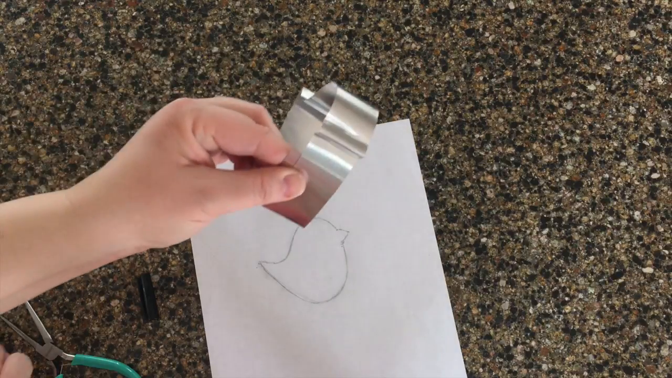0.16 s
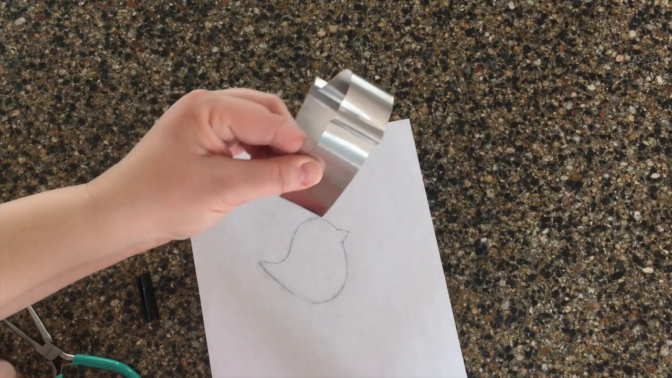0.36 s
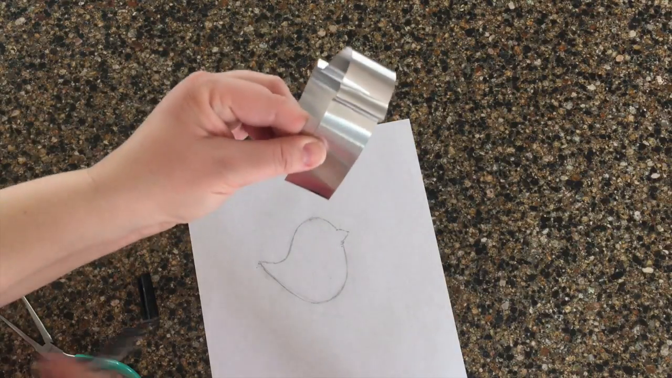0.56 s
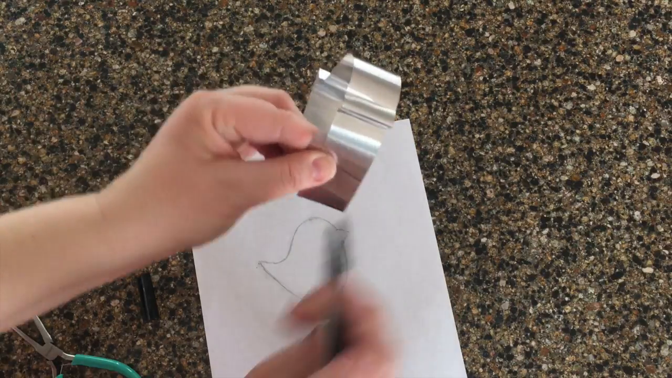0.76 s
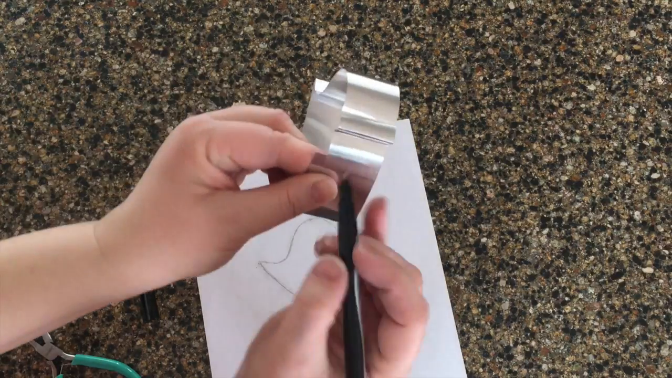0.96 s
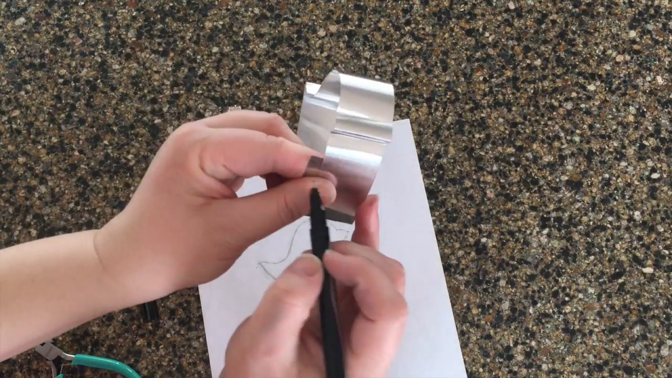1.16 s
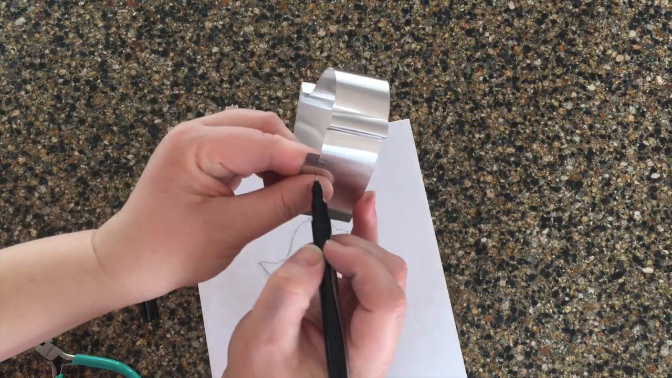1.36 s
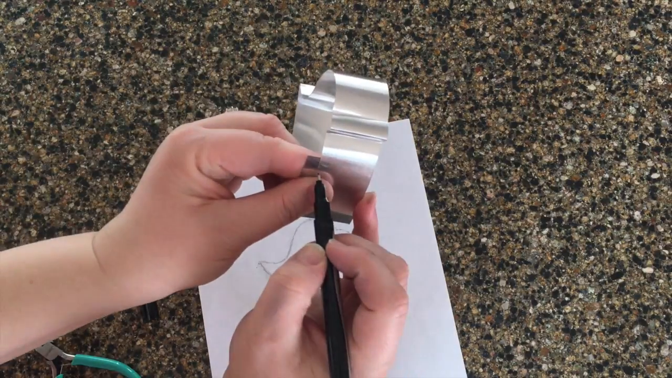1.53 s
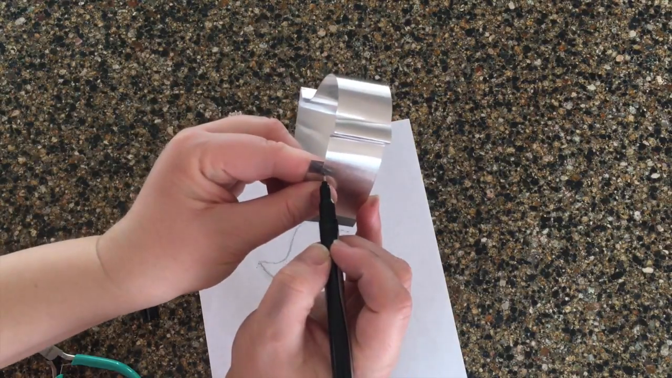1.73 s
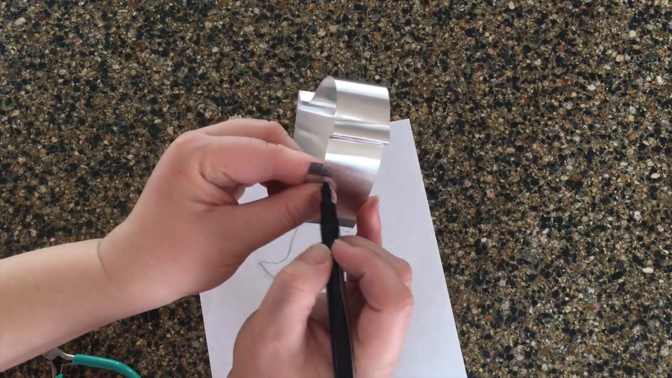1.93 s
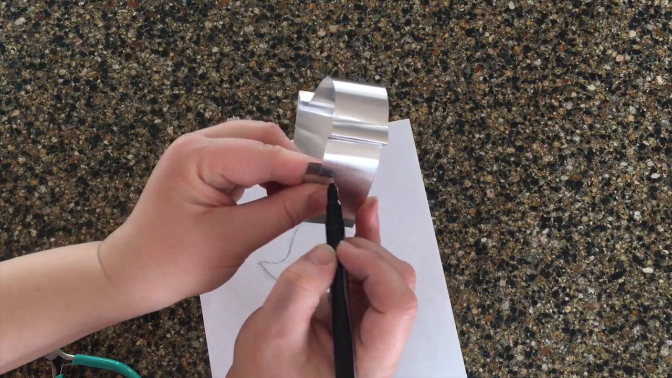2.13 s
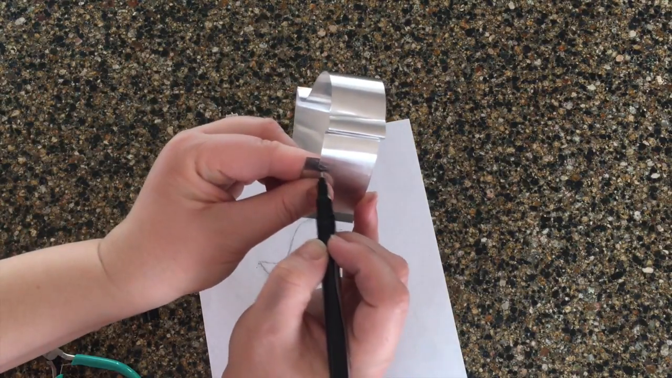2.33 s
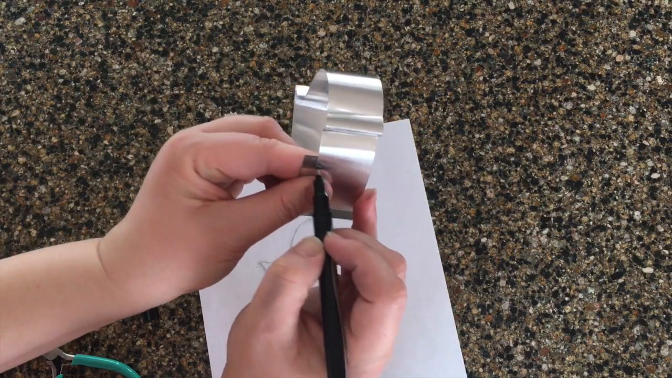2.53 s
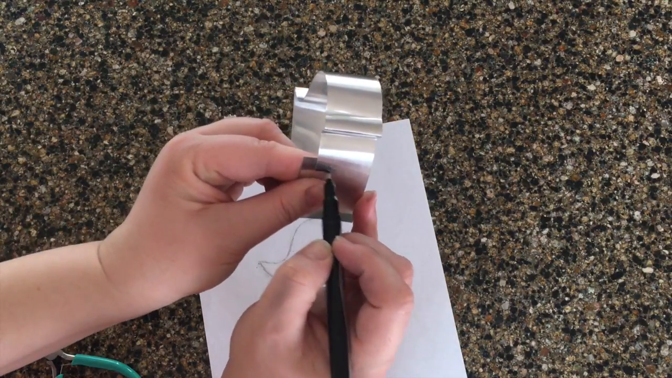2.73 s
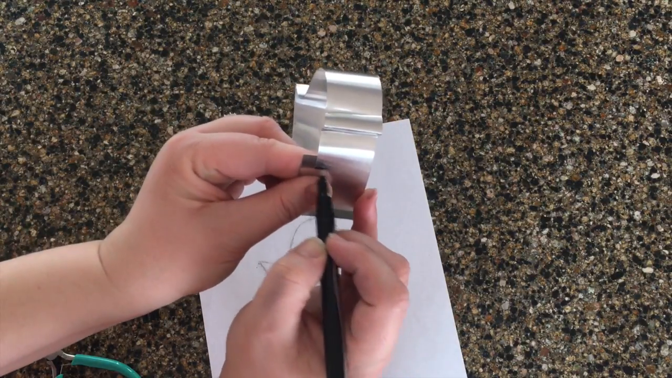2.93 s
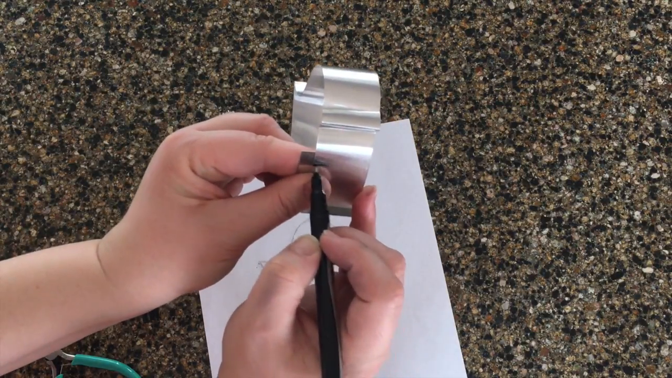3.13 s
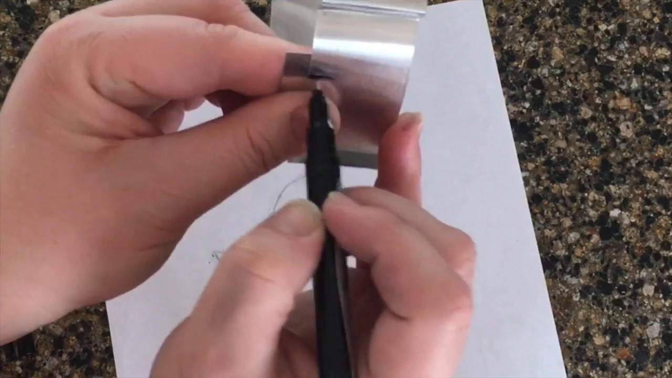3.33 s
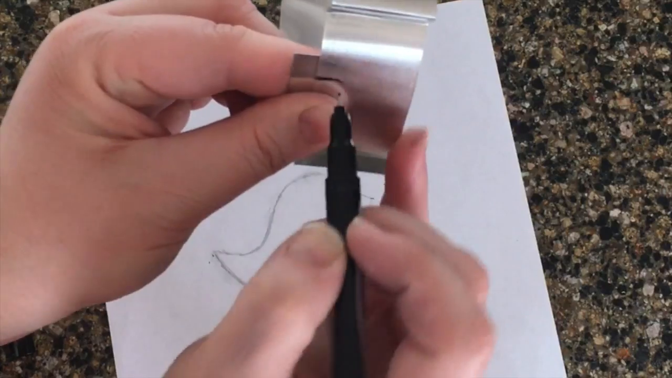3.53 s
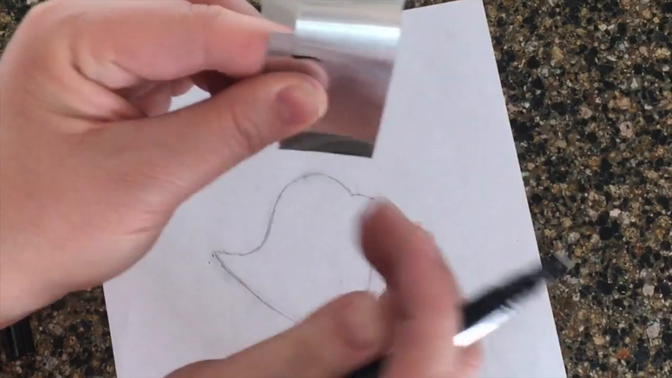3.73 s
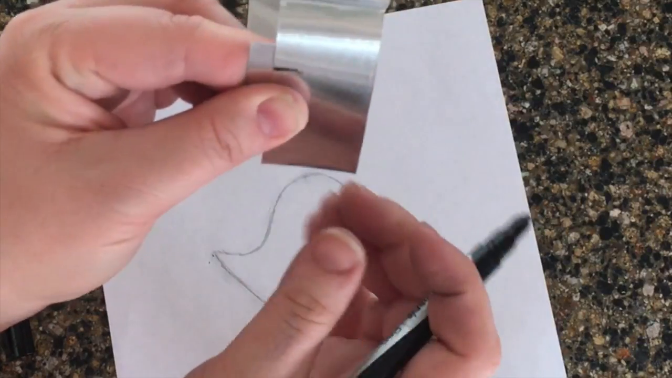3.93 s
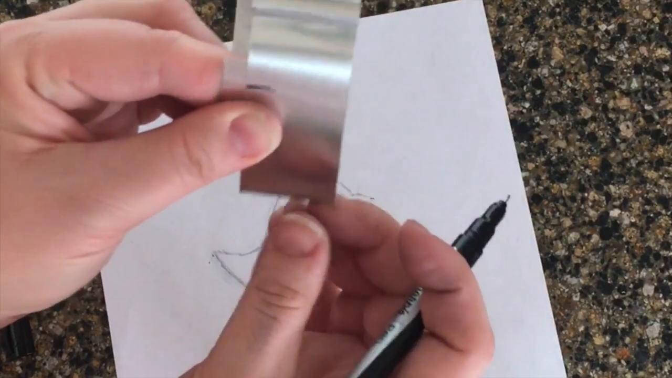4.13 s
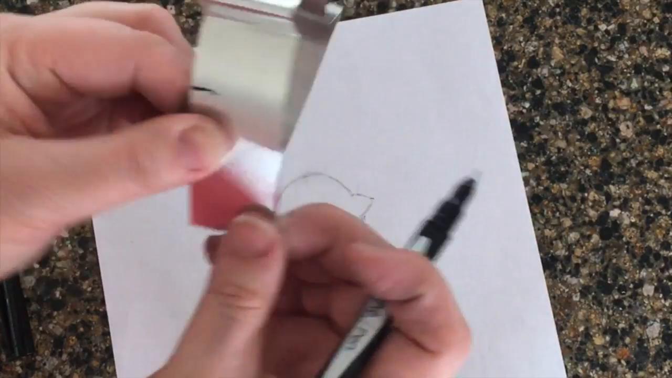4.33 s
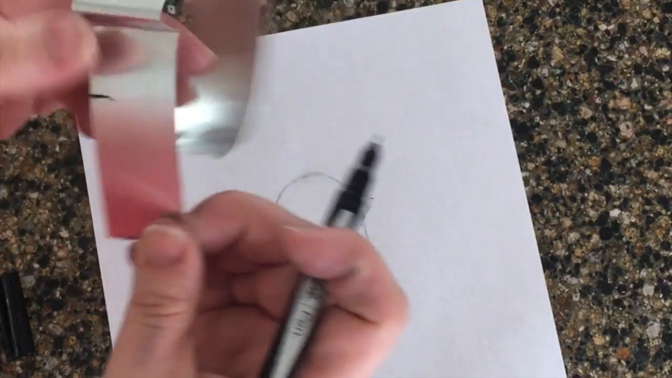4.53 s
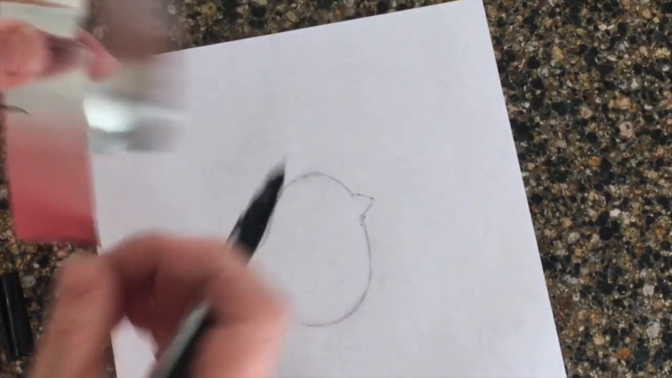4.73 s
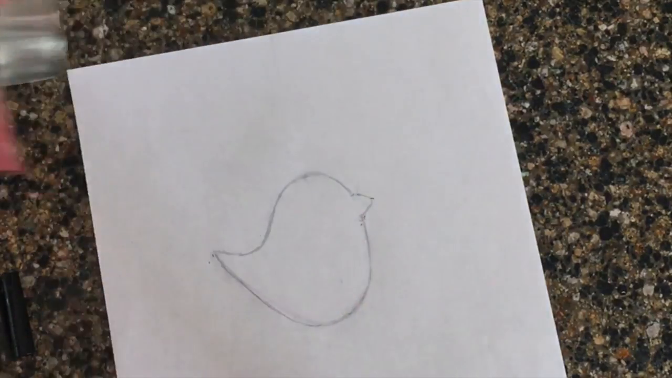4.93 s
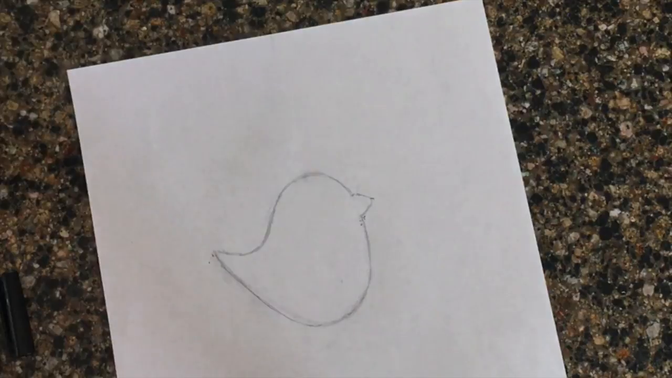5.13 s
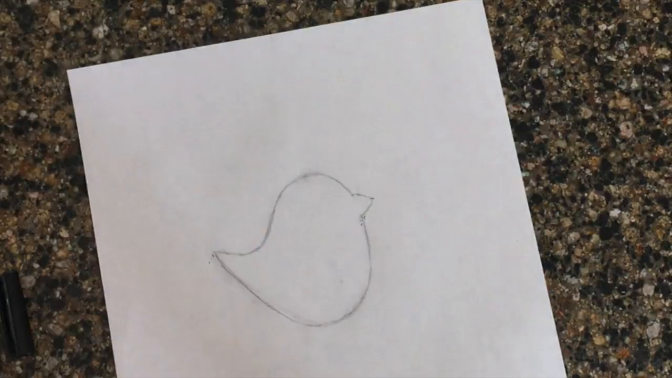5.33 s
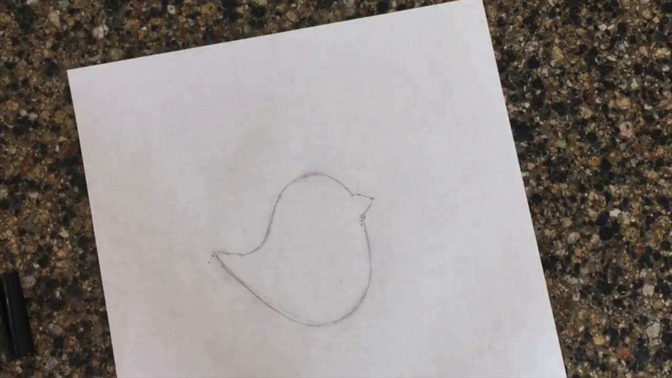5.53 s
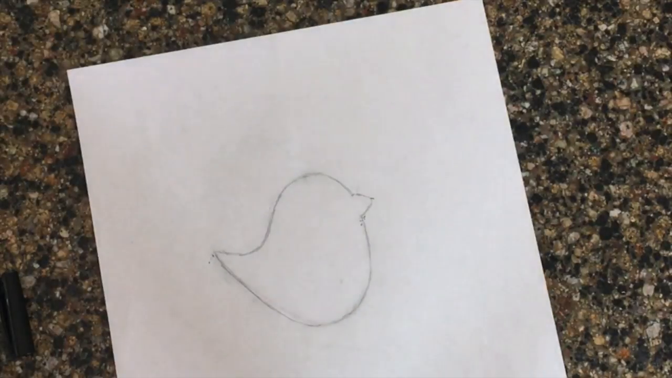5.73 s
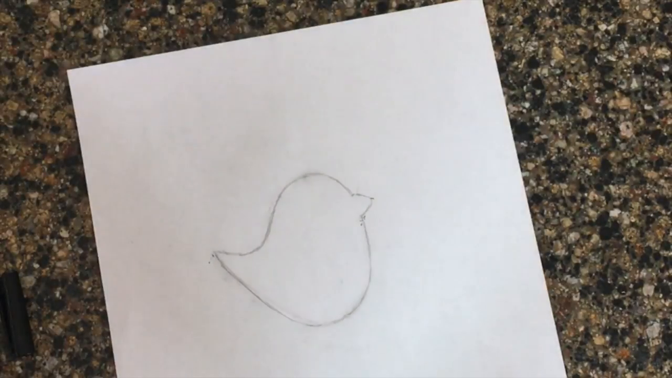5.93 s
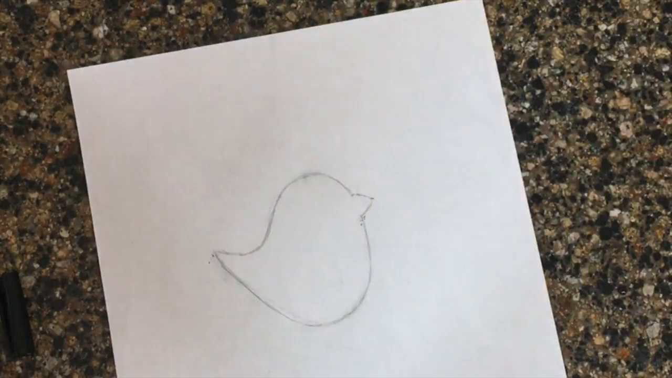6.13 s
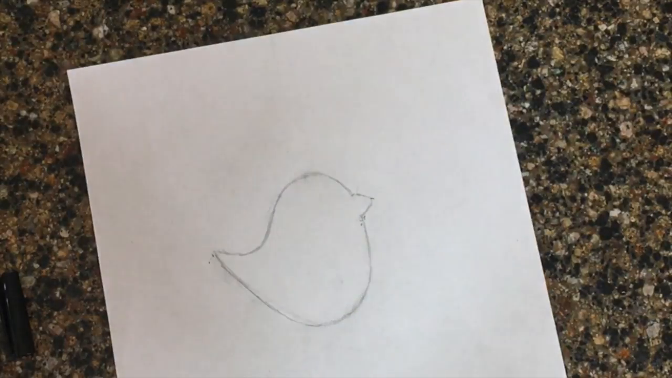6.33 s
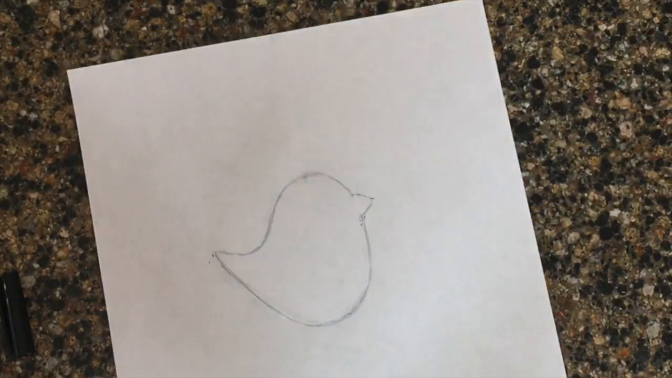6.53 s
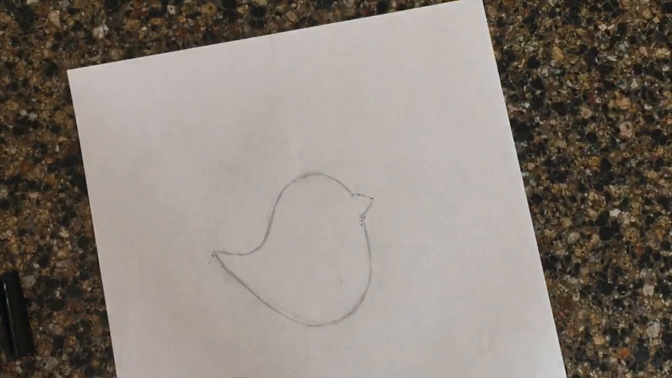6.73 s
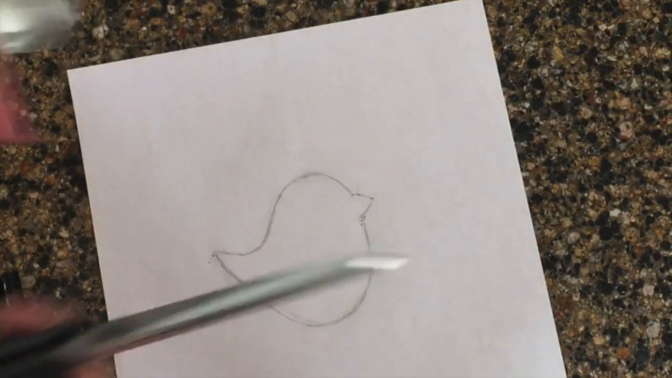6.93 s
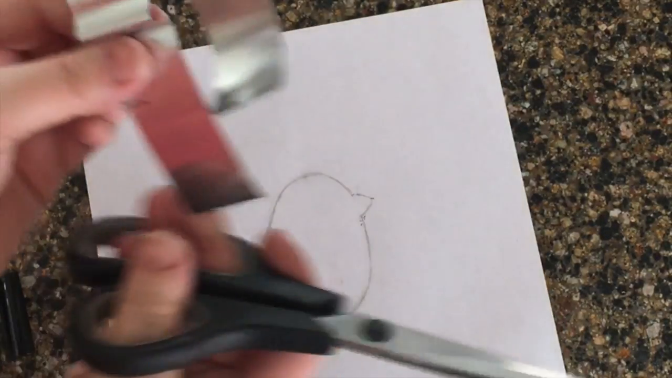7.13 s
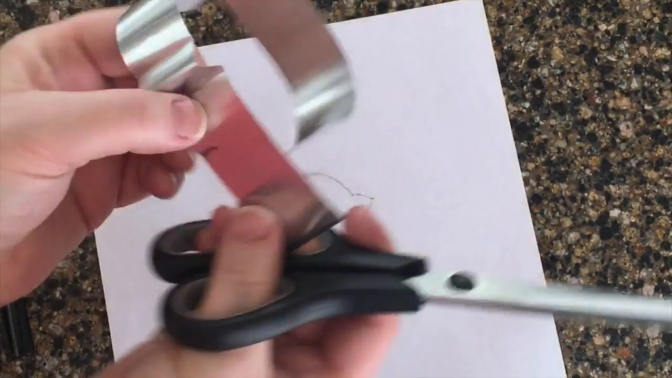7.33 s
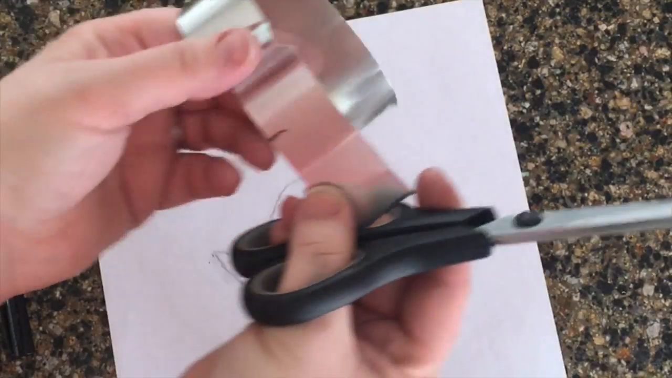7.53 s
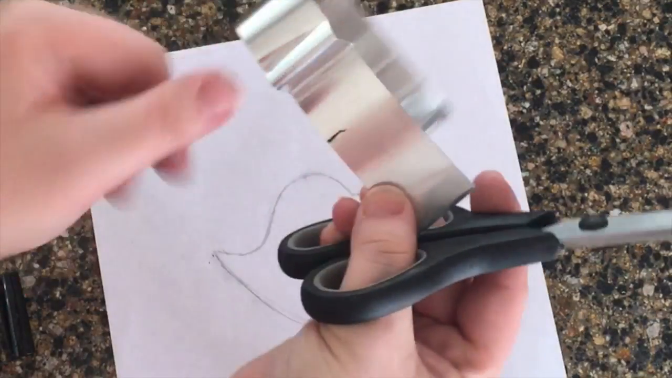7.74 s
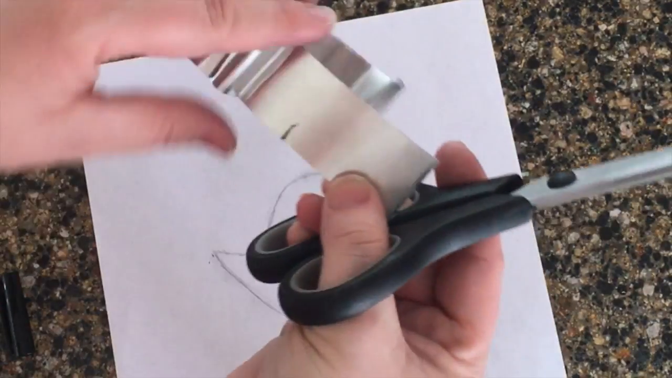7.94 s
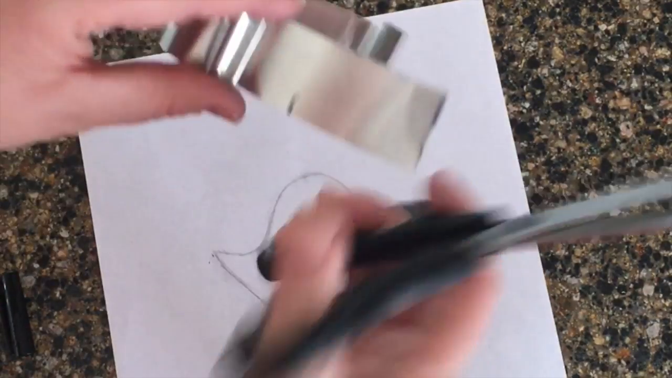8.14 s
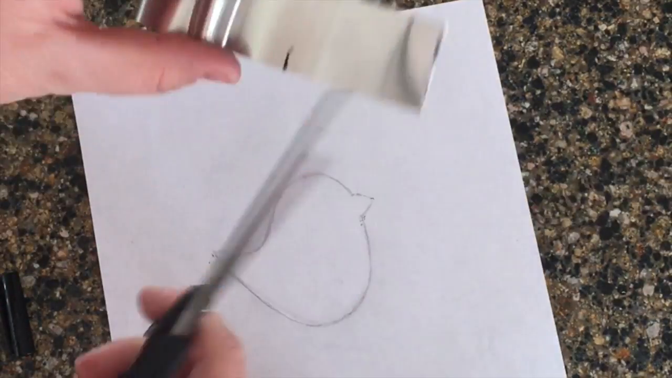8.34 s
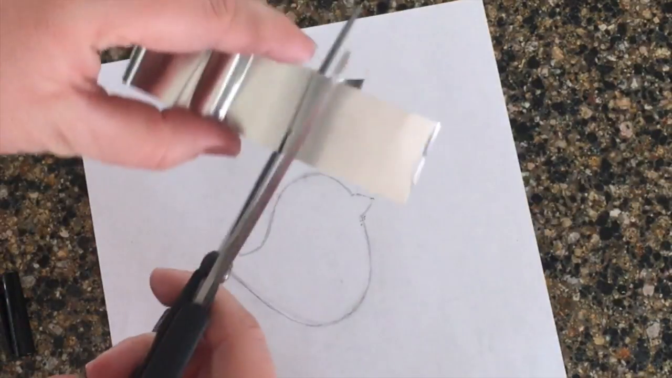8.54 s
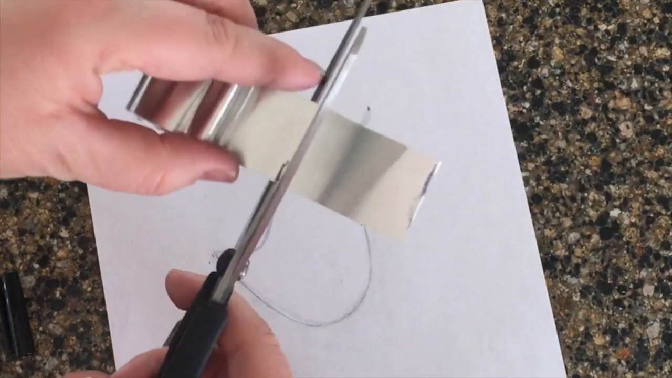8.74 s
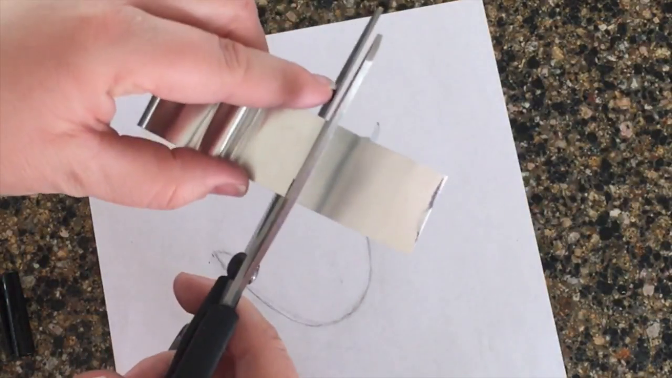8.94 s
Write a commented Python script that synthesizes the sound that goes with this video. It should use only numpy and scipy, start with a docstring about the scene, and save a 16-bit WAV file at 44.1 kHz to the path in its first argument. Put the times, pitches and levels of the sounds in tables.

```python
"""Stone kitchen counter in a small hard room: craft work with a felt pen, thin aluminium and scissors.
The pen marks a curled strip that ticks, creaks and pings in the fingers; noise slips and blows drive its modes.
The pen clacks down, scissors are knocked and dragged off the stone, then snap open and slide onto the strip.
Squeaks and pings are wobbling sines. Diffuse echoes answer; filtered noise and tones make the appliance's hum."""
import sys
import numpy as np
from scipy import signal
from scipy.fft import rfft, irfft
from scipy.io import wavfile
from scipy.ndimage import uniform_filter1d, map_coordinates

SR = 44100
rng = np.random.default_rng(int(sys.argv[2]) if len(sys.argv) > 2 else 0)


def store_wav(level_fs):
    """Save 16-bit WAV to argv[1]."""
    pcm = np.round(np.clip(np.atleast_2d(level_fs), -1, 1) * 32767)
    wavfile.write(sys.argv[1], SR, pcm.T.astype(np.int16))


N = 399987
TOP_HZ = 15850

# Still air in the room. Each row: frequency in Hz, relative spectral level in dB.
AIR_COLOUR = [(25, -38), (40, -12), (90, -3), (240, -17), (600, -23), (1200, -28), (1800, -34.5),
              (5000, -41), (10300, -41), (13000, -36), (15500, -37.5)]
AIR_RMS_DB = -52
# Appliance's narrow noise bands. Each row: centre in Hz, width in Hz, level in dB rms.
HUM_BANDS = [(77.6, 24, -62.5), (315.8, 17, -66.5), (2240, 165, -71)]
# Appliance's tones. Each row: frequency in Hz, mean level in dB rms.
HUM_TONES = [(53.5, -57), (642, -68.5)]
# The background dips briefly: centre, half length to 1/e of the depth, depth.
DIP_S, DIP_HALF_LENGTH_S, DIP_DB = 3.378, 0.006, -14

# Sleeve and skin brushing.
# Each row: peak in seconds, rise in seconds, fall in seconds, level in dB, tilt in dB per octave.
BRUSHES = [(.02, 0.036, 0.041, -57, 1.5), (.27, 0.16, 0.064, -54.5, -4.5), (.83, .23, 0.24, -58.5, -0.5),
           (.877, 0.016, .015, -53, 12), (.955, 0.025, 0.07, -57, 18)]
# Dull bumps of the hands, and low thuds of the counter under pen and scissors.
# Each row: peak in seconds, level in dB, tilt in dB per octave.
BUMPS = [(.008, -41, -3.5), (5.384, -45.5, 3), (5.993, -37, 2.5), (6.055, -39.5, 3), (7.345, -37.5, -2.5),
         (7.42, -43.5, -0.5)]
BUMP_RISE_S, BUMP_FALL_S = 0.008, 0.034
# Contact spectra of brushing and bumps. Each row: frequency in Hz, relative level in dB.
BRUSH_COLOUR = [(150, -7.5), (500, -3), (1200, -8.5), (3000, -8.5), (7000, -18), (15000, -16.5)]
BUMP_COLOUR = [(40, -14), (100, -0.5), (160, 10), (215, -7.5), (290, -1), (400, -9), (550, -11.5),
               (1200, -26.5), (4000, -42)]

# Small dry ticks of fingernail and pen.
# Each row: start in seconds, level in dB before the group gain, tilt in dB per octave.
NAIL_TICKS = [(0.2675, -42.5, 2), (2.9866, -32, 3), (5.0095, -42.5, 5), (5.0675, -46, 2)]
# Strip ticking as it flexes.
# Each row: start in seconds, level in dB before the group gain, tilt in dB per octave.
STRIP_TICKS = [(3.6265, -34, -4), (4.307, -41, -4), (4.4334, -37.5, -7), (4.4815, -31, -5),
               (4.4945, -29, -1), (4.5085, -18, 1.5), (4.5948, -28, 1.5), (6.5293, -32.5, -2),
               (6.6885, -30.5, 2), (7.0242, -29, -3), (7.2575, -41, -6), (7.279, -36, -4), (7.4157, -27, 5),
               (7.7102, -31, -3), (8.0168, -42.5, -1), (8.1011, -40, -1), (8.138, -35, -2)]
# Fingers flexing the strip. Each row: peak in seconds, level in dB, tilt in dB per octave.
STRIP_FLEXES = [(1.155, -59.5, -4.5), (3.63, -49.5, -2), (4.364, -52, -6), (4.486, -42, -4.5),
                (4.513, -29.5, 2), (4.805, -47, -0.5), (4.82, -41.5, -0.5)]
FLEX_RISE_S, FLEX_FALL_S = 0.013, 0.012
# Strip sliding through the fingers as it is picked up, then from hand to hand.
# Each row: time in seconds, level in dB, tilt in dB per octave.
PICK_UP = [(6.6, -60, -6), (6.64, -44, -1.5), (6.675, -57.5, -4), (6.70, -38, 3.5), (6.745, -57.5, -4),
           (6.805, -50, 8), (6.85, -71, -10), (6.935, -51, 2), (7.0, -63, -5)]
REGRIP = [(7.03, -53.5, -1), (7.14, -63.5, -5.5), (7.25, -56.5, -1), (7.29, -45.5, -3.5), (7.35, -52, 4),
          (7.435, -34.5, 4), (7.48, -56.5, -0.5), (7.63, -60, -1), (7.69, -47, 2.5), (7.75, -71, -7)]
# Contact spectrum of the strip. Each row: frequency in Hz, relative level in dB.
STRIP_COLOUR = [(300, -32), (1000, -5.5), (2000, -2.5), (4000, 2.5), (6500, -1.5), (9000, 4), (12000, 7),
                (15500, 6.5)]
# Modes of the strip. Each row: nominal frequency in Hz, relative level in dB, free t60 in seconds.
STRIP_MODES = [(1640, -12.5, 0.1), (2230, -10, 0.073), (2920, -13, 0.084), (3870, -4.5, 0.047),
               (4120, -12, 0.054), (5630, -1.5, 0.07), (6190, 10.5, 0.026), (6590, 5, 0.062),
               (8300, -5, 0.11), (9440, 3, 0.038), (12060, 4, 0.047), (13200, 4, 0.06), (14640, 8, 0.063)]

# Pen strokes: first peak, first period, shortening of each further period.
PEN_START_S, PEN_PERIOD_S, PEN_QUICKEN_S = 2.03, 0.147, 0.0019
# How hard and how far the hand moves the nib. Each row: time in seconds, level in dB, rise in seconds.
PEN_PRESSURE = [(2.029, -55.5, 0.054), (2.32, -55, 0.066), (2.6, -57, 0.052), (2.89, -52, 0.058),
                (3.03, -58, .035), (3.398, -56.5, 0.022)]
STROKE_FALL_S = 0.013  # quick stop at the turn
# Pen landing on the stone.
# Each row: start in seconds, level in dB before the group gain, tilt in dB per octave.
PEN_TAPS = [(5.3075, -14, 1.5), (5.3152, -29, 2), (5.3602, -27, -2), (5.3766, -14, 2.5),
            (5.3791, -8.5, -0.5), (5.4157, -23, -1.5)]
# Contact spectra of nib and barrel. Each row: frequency in Hz, relative level in dB.
NIB_COLOUR = [(900, -81), (1650, 4), (2000, -9), (2350, 6), (2800, -10), (4200, -0.5), (4850, -19),
              (5400, -0.5), (6600, 1), (7700, -3.5), (15500, 2)]
PEN_COLOUR = [(150, -28), (380, -2.5), (600, -11), (880, -2.5), (1300, -6.5), (1800, -1), (3600, 1),
              (5000, -1.5), (6300, 3.5), (8000, -2.5), (9600, 2.5), (11500, -5), (15200, -3)]

# Sliding metal edge catching.
# Each row: peak in seconds, half length to 1/e in seconds, mean pitch in Hz, level in dB.
SQUEAKS = [(3.631, 0.012, 3690, -52), (4.5, 0.0085, 6000, -38), (6.118, 0.0075, 4150, -36.5),
           (6.126, .024, 5750, -43), (6.257, 0.0062, 5300, -43), (7.28, 0.016, 3950, -50),
           (7.287, .02, 6450, -48.5), (7.298, 0.015, 3400, -51), (8.193, 0.0067, 3750, -42),
           (8.197, 0.013, 1870, -43), (8.226, 0.015, 1530, -50.5), (8.238, .012, 3460, -43),
           (8.513, .018, 1870, -46), (8.768, 0.011, 1880, -50), (8.79, .018, 3430, -48)]
# Stutter in level; slow slide and quick tremble as shares of the pitch.
SQUEAK_STUTTER_DB, SQUEAK_SLIDE, SQUEAK_TREMBLE = 5.5, 0.0112, 0.021

# Metal springing free. Each row: start in seconds, settled pitch in Hz, level in dB, t60 in seconds.
PINGS = [(4.503, 3030, -40.5, 0.16), (4.505, 6040, -25, 0.055), (4.509, 5600, -39, 0.099),
         (4.82, 4330, -39.5, 0.16), (4.819, 3280, -45, 0.13), (4.82, 4910, -50, 0.1),
         (6.689, 4280, -42, 0.28), (6.689, 4900, -50, 0.17), (7.711, 4750, -46.5, 0.093),
         (8.527, 5520, -38.5, 0.16)]
# Each ping starts slightly flat, by a share of the pitch, and soon settles.
PING_SAG, PING_SETTLE_S = 0.04, 0.004
# Each ping has a faint twin, lower by a share of the pitch, at a relative level.
TWIN_SPLIT, TWIN_DB = 0.0203, -19

# Scissors shifting under the hand, then dragged off the stone.
# Each row: time in seconds, level in dB, tilt in dB per octave.
SHOVE = [(5.945, -64, -6), (5.97, -41.5, -0.5), (6.035, -46.5, 3), (6.065, -36.5, 2), (6.12, -37.5, 3),
         (6.17, -53, 2), (6.22, -55, 2)]
DRAG = [(6.225, -56, 2), (6.255, -39.5, 6), (6.286, -36, 5.5), (6.291, -27, -2), (6.36, -31.5, -0.5),
        (6.395, -34.5, 0.5), (6.44, -46.5, -2.5), (6.5, -55, -3)]
# Scissors knocking on the stone.
# Each row: start in seconds, level in dB before the group gain, tilt in dB per octave.
KNOCKS = [(5.957, -25, 2), (5.9622, -17, 0.5), (6.0507, -8.5, 2), (6.2675, -22.5, 3), (6.289, -16.5, 3.5)]
# Contact spectra of knocks and dragging. Each row: frequency in Hz, relative level in dB.
KNOCK_COLOUR = [(150, -23), (280, 17), (390, -1), (540, 10.5), (800, -1.5), (1400, 7.5), (2000, -4),
                (2700, 4.5), (3400, -0.5), (4250, 6.5), (7200, -5), (11000, 1.5), (15500, -5)]
DRAG_COLOUR = [(200, -26), (850, -15.5), (1400, -7), (2400, 0), (3000, -0.5), (3900, 4.5), (5000, -4),
               (8000, -4.5), (10000, -0.5), (15500, -5)]

# Strip's edge scraping on steel, and steel blades sliding on each other.
# Each row: peak in seconds, rise in seconds, fall in seconds, level in dB, tilt in dB per octave.
EDGE_RUBS = [(8.191, 0.0067, 0.018, -35.5, 1), (8.228, 0.016, 0.012, -32, 3), (8.69, 0.024, 0.019, -40, -1),
             (8.775, 0.027, 0.033, -45.5, -1.5), (8.90, 0.025, 0.028, -55.5, -3),
             (8.984, 0.0073, 0.0055, -56.5, -2)]
BLADE_RUBS = [(8.464, 0.017, 0.016, -32.5, 0), (8.503, 0.013, 0.018, -31, 3),
              (8.526, 0.012, 0.0066, -27, 4.5)]
# Edge clicking against the steel, and blades snapping apart.
# Each row: start in seconds, level in dB before the group gain, tilt in dB per octave.
EDGE_TICKS = [(8.1876, -31, -1.5), (8.2455, -29, -2), (8.614, -22, -3)]
BLADE_SNAPS = [(8.4364, -25, -3), (8.4376, -8, 1), (8.4425, -18, 2), (8.4725, -20, 2.5)]
# Contact spectrum of the blades. Each row: frequency in Hz, relative level in dB.
BLADE_COLOUR = [(300, -11.5), (900, -13), (1500, -5.5), (2600, -4.5), (4000, 0.5), (5000, -4.5),
                (6000, -0.5), (8000, -2), (12000, 0), (15500, 2)]
# Modes of edge and blades. Each row: nominal frequency in Hz, relative level in dB, free t60 in seconds.
EDGE_MODES = [(1303, 1, 0.04), (2230, 1, 0.025), (3510, -2, 0.049), (3870, 3, 0.025), (4300, -1, 0.053),
              (5800, 1.5, 0.04), (7610, 4.5, 0.023), (9360, 2, 0.037)]
BLADE_MODES = [(1830, -9, 0.072), (2360, 0, 0.045), (2550, 2.5, 0.12), (2780, -1.5, 0.11), (3690, -9, 0.06),
               (4230, -8.5, 0.097), (5620, 1, 0.06), (6350, -3, 0.048), (8750, 4, 0.031), (9750, 0, 0.07),
               (10070, 8.5, 0.038), (11200, -8, 0.17), (12790, 1, 0.055), (14000, 4, 0.035),
               (14600, 7.5, 0.025)]

# Reverberation. Each row: frequency in Hz, t60 in seconds.
ROOM_T60 = [(150, 0.72), (1000, 0.57), (3000, 0.44), (7000, 0.34), (15000, 0.23)]


def amp(db):
    """Decibels to gain."""
    return 10 ** (np.asarray(db) / 20)


def unit(x):
    """Scale to an energy of one."""
    return x / np.sqrt(np.sum(x ** 2))


def seconds(length_s):
    """Time axis in seconds."""
    return np.arange(int(length_s * SR) + 1) / SR


def add(track, start_s, sound):
    """Mix a sound into a track, trimmed at both ends."""
    i = int(round(start_s * SR))
    sound, i = sound[max(-i, 0):], max(i, 0)
    track[i:i + len(sound)] += sound[:N - i]


def through(x, response):
    """Pass a track through an impulse response."""
    return signal.oaconvolve(x, response)[:N]


def on_log_axis(points, hz):
    """Interpolate (Hz, value) points over log frequency."""
    f, value = np.transpose(points)
    return np.interp(np.log(hz + 1), np.log(f), value)


def fade(t, t60_s):
    """Exponential decay, 60 dB down at t60."""
    return np.exp(-np.log(1000) * t / t60_s)


def wander(size, rate_hz):
    """Random path through new normal values at a given rate."""
    steps = np.arange(size) * rate_hz / SR
    count = int(steps[-1]) + 2
    return np.interp(steps, np.arange(count), rng.standard_normal(count))


def causal(gain):
    """Minimum-phase response with a given gain at each frequency."""
    cepstrum = irfft(np.log(gain))
    half = len(cepstrum) // 2
    cepstrum[1:half] *= 2
    cepstrum[half + 1:] = 0
    return unit(irfft(np.exp(rfft(cepstrum))))


def flatten(force, size=4096):
    """Even out a force's spectrum, leaving the colour to the struck thing."""
    power = uniform_filter1d(np.abs(rfft(force, size)) ** 2, size=15)
    return unit(signal.fftconvolve(force, causal(1 / np.sqrt(power))))


def contact(colour, tilt_db, size=2048):
    """Response of a contact spectrum; harder contact tilts it toward the treble."""
    hz = np.arange(size // 2 + 1) * SR / size
    tilt = tilt_db * np.log2(np.clip(hz, 80, TOP_HZ))
    top_cut = 30 * (hz > TOP_HZ + 500)
    return causal(amp(on_log_axis(colour, hz) + tilt - top_cut))


def body(colour, modes=(), ring_db=0, bend=0, uneven_db=0, sustain=1, shimmer_db=-40, shimmer_t60_s=0.05):
    """Per-touch response: bend retunes modes, place weights them, grip shortens them; weak modes shimmer."""
    def response(tilt_db):
        out, t = contact(colour, tilt_db), seconds(0.3)
        if not len(modes):
            return out
        modal = np.zeros(len(t))
        for hz, db, t60_s in modes:
            shift, weight = rng.standard_normal(2)
            tone = np.cos(2 * np.pi * hz * (1 + bend * shift) * t)
            modal += amp(db + uneven_db * weight) * fade(t, t60_s * sustain) * tone
        shimmer = unit(rng.standard_normal(len(t)) * fade(t, shimmer_t60_s))
        ring = amp(ring_db) * unit(modal) + amp(shimmer_db) * shimmer
        ring[0] += 1  # direct contact sound
        return unit(signal.fftconvolve(out, ring))
    return response


def rub(rows, response, grit_db, jerk_db=0, waver=0):
    """Friction: dense tiny slips of uneven size that swell and die with each stroke."""
    out = np.zeros(N)
    for peak_s, rise_s, fall_s, db, tilt_db in rows:
        t = seconds(2 * (rise_s + fall_s)) - 2 * rise_s
        size = np.repeat(rng.exponential(size=len(t)), 16)[:len(t)].clip(0, 4)
        slips = rng.standard_normal(len(t)) * amp(grit_db * size)
        slips = slips * amp(jerk_db * wander(len(t), 133))  # catches and lets go
        pressure = np.exp(-(t / np.where(t < 0, rise_s, fall_s)) ** 2)
        sound = signal.fftconvolve(pressure * slips / slips.std(), response(tilt_db))
        if waver:  # resonances slide up and down
            read_at = np.cumsum(1 + waver * wander(len(sound), 41.6))
            sound = map_coordinates(sound, [read_at], order=5)
        add(out, peak_s - 2 * rise_s, amp(db) * sound)
    return out


def strike(rows, response, chatter, t60_s, gain_db):
    """Blows: one sharp push plus decaying chatter at the contact."""
    out, t = np.zeros(N), seconds(0.06)
    for start_s, db, tilt_db in rows:
        force = chatter * unit(rng.standard_normal(len(t)) * fade(t, t60_s))
        force[0] += 1
        sound = signal.fftconvolve(flatten(force), response(tilt_db))
        add(out, start_s, amp(db + gain_db) * sound)
    return out


def swells(rows, rise_s, fall_s):
    """Short touches sharing one rise and one fall."""
    return [(peak_s, rise_s, fall_s, db, tilt_db) for peak_s, db, tilt_db in rows]


def slide(curve, count):
    """Long slide: a chain of overlapping catches following its level and tilt."""
    when, db, tilt_db = np.transpose(curve)
    peaks, step_s = np.linspace(when[0], when[-1], count, retstep=True)
    return [(peak_s, step_s, step_s, np.interp(peak_s, when, db), np.interp(peak_s, when, tilt_db))
            for peak_s in peaks]


def background(swell_s=1.566, swell_half_length_s=0.35, swell_hz=92, swell_db=-48):
    """Rumble and hiss of filtered noise, an appliance's bands and tones, a low drone that swells once."""
    hz, t = np.arange(N // 2 + 1) * SR / N, np.arange(N) / SR

    def noise(gain):
        """Noise of a given spectrum, rms of one."""
        return np.sqrt(N) * unit(irfft(rfft(rng.standard_normal(N)) * gain, N))

    def band(centre_hz, width_hz):
        """Narrow noise, amplitude halved at the edges of the width."""
        return noise(1 / (1 + (2 * (hz - centre_hz) / width_hz) ** 2))

    air = amp(AIR_RMS_DB) * noise(amp(on_log_axis(AIR_COLOUR, hz)))
    hum = sum(amp(db) * band(centre_hz, width_hz) for centre_hz, width_hz, db in HUM_BANDS)
    tones = np.zeros(N)
    for tone_hz, db in HUM_TONES:
        level = np.sqrt(2) * amp(db + 1.3 * wander(N, 5.7))
        tones += level * np.sin(2 * np.pi * tone_hz * t + 0.7 * wander(N, 9))
    swell = np.exp(-((t - swell_s) / swell_half_length_s) ** 2)
    drone = amp(swell_db) * swell * band(swell_hz, 4.1)
    dip = amp(DIP_DB * np.exp(-((t - DIP_S) / DIP_HALF_LENGTH_S) ** 2))
    return dip * (air + hum + tones + drone)


def brushes_and_bumps():
    """Soft brushing friction; dull bumps and counter thuds that rise fast and die more slowly."""
    brushing = rub(BRUSHES, body(BRUSH_COLOUR), grit_db=1.5)
    bumps = rub(swells(BUMPS, BUMP_RISE_S, BUMP_FALL_S), body(BUMP_COLOUR), grit_db=-6.5)
    return brushing + bumps


def strip():
    """Ticks ring the aluminium, rubbing fingers damp it; a nail only clicks."""
    free = body(STRIP_COLOUR, STRIP_MODES, ring_db=3.5, bend=0.013, uneven_db=5.5, sustain=0.96,
                shimmer_db=-9, shimmer_t60_s=0.11)
    held = body(STRIP_COLOUR, STRIP_MODES, ring_db=3, bend=0.024, uneven_db=2, sustain=0.39,
                shimmer_db=1, shimmer_t60_s=0.062)
    nails = strike(NAIL_TICKS, body(STRIP_COLOUR), chatter=2.1, t60_s=0.029, gain_db=17)
    flexes = swells(STRIP_FLEXES, FLEX_RISE_S, FLEX_FALL_S)
    touches = flexes + slide(PICK_UP, count=24) + slide(REGRIP, count=40)
    creaks = rub(touches, held, grit_db=2.5, jerk_db=4.5, waver=0.0065)
    ticks = strike(STRIP_TICKS, free, chatter=1.9, t60_s=0.022, gain_db=14)
    return nails + creaks + ticks


def to_and_fro(count=11):
    """Pen strokes in a slowly quickening rhythm, as loud and long as the hand makes them."""
    k = np.arange(count)
    peaks = PEN_START_S + PEN_PERIOD_S * k - PEN_QUICKEN_S * k * (k - 1) / 2
    when, db, rise_s = np.transpose(PEN_PRESSURE)
    return [(peak_s, np.interp(peak_s, when, rise_s), STROKE_FALL_S, np.interp(peak_s, when, db), 0)
            for peak_s in peaks]


def pen():
    """Friction of the felt nib to and fro, then blows of the plastic barrel on stone."""
    nib = rub(to_and_fro(), body(NIB_COLOUR), grit_db=0, jerk_db=3)
    clack = strike(PEN_TAPS, body(PEN_COLOUR), chatter=1.9, t60_s=0.0077, gain_db=13)
    return nib, clack


def squeaks(slips_per_s=520, slides_per_s=55):
    """Stick and slip drives one metal resonance for a moment: a rough, unsteady note."""
    out = np.zeros(N)
    for peak_s, half_length_s, hz, db in SQUEAKS:
        t = seconds(4 * half_length_s) - 2 * half_length_s
        slow_slide = SQUEAK_SLIDE * wander(len(t), slides_per_s)
        tremble = SQUEAK_TREMBLE * wander(len(t), slips_per_s)
        phase = 2 * np.pi * np.cumsum(hz * (1 + slow_slide + tremble)) / SR
        note = amp(SQUEAK_STUTTER_DB * wander(len(t), slips_per_s)) * np.sin(phase)
        envelope = np.exp(-(t / half_length_s) ** 2)
        add(out, peak_s - 2 * half_length_s, amp(db) * envelope * note / note.std())
    return out


def pings():
    """Freed metal sings and decays; each ping starts slightly flat, wobbles and has a faint lower twin."""
    out, t = np.zeros(N), seconds(0.4)
    for start_s, hz, db, t60_s in PINGS:
        wobble = 1 + 0.0069 * wander(len(t), 152) - PING_SAG * np.exp(-t / PING_SETTLE_S)
        phase = 2 * np.pi * np.cumsum(hz * wobble) / SR
        pair = np.sin(phase) + amp(TWIN_DB) * np.sin(phase * (1 - TWIN_SPLIT))
        add(out, start_s, amp(db) * fade(t, t60_s) * pair)
    return out


def counter():
    """Scissors damped by the stone: they knock, ring faintly as they shift, rasp when dragged."""
    damped = body(DRAG_COLOUR, BLADE_MODES, ring_db=-16, bend=0.023, sustain=0.35)
    shifting = rub(slide(SHOVE, count=28), damped, grit_db=3, jerk_db=5)
    knocks = strike(KNOCKS, body(KNOCK_COLOUR), chatter=2.4, t60_s=0.017, gain_db=12)
    dragging = rub(slide(DRAG, count=96), body(DRAG_COLOUR), grit_db=3, jerk_db=3)
    return shifting + knocks + dragging


def blades():
    """Steel in the air rings as it snaps open; the strip's edge rasps, pitch sliding with the contact."""
    steel = body(BLADE_COLOUR, BLADE_MODES, ring_db=8, bend=0.0037, uneven_db=0.5,
                 shimmer_db=0, shimmer_t60_s=0.077)
    edge = body(BLADE_COLOUR, EDGE_MODES, ring_db=-6.5, bend=0.013)
    clicks = strike(EDGE_TICKS, edge, chatter=3, t60_s=0.014, gain_db=12)
    rasps = rub(EDGE_RUBS, edge, grit_db=3, jerk_db=2.5, waver=0.03)
    snaps = strike(BLADE_SNAPS, steel, chatter=2.9, t60_s=0.0072, gain_db=16)
    sliding = rub(BLADE_RUBS, steel, grit_db=2.5, jerk_db=1.5, waver=0.0129)
    return clicks + rasps + snaps + sliding


def room(gap_s=0.0053, treble_db=-5, early_db=3):
    """Echoes after a short gap, first distinct and then diffuse; the treble dies first."""
    t = seconds(0.76)
    unevenness_db = early_db * fade(t, 0.49) * rng.standard_normal(len(t))
    echoes = rng.standard_normal(len(t)) * amp(unevenness_db)
    hz, when, cells = signal.stft(echoes, SR, nperseg=256)
    decay = fade(when, on_log_axis(ROOM_T60, hz)[:, None])
    treble = amp(treble_db * hz / TOP_HZ)[:, None]
    tail = signal.istft(cells * decay * treble)[1][:len(t)]
    return unit(tail * (t > gap_s))


def scene():
    """Handwork is close and dry; things on the counter lie further off and wake the room."""
    nib, clack = pen()
    near = brushes_and_bumps() + strip() + nib + blades()
    singing = squeaks() + pings()
    scissors = counter()
    sends = amp(-10.5) * near + amp(-14.5) * singing + amp(-8.5) * clack + amp(-7.5) * scissors
    echoes = through(sends, room())
    return (near + singing + clack + scissors + echoes + background())[None]


def record(dry, ceiling=1.0):
    """Soft saturation rounds the sharpest peaks; a steep low-pass cuts the top."""
    rounded = ceiling * np.tanh(dry / ceiling)
    low_pass = signal.ellip(10, 0.2, 70, TOP_HZ, fs=SR, output="sos")
    return signal.sosfilt(low_pass, rounded)


dry = scene()
out = record(dry)
store_wav(out)
```